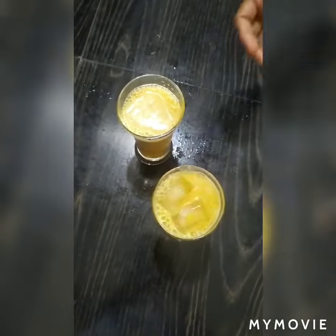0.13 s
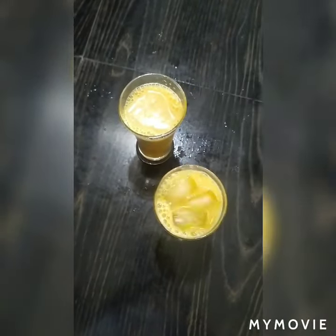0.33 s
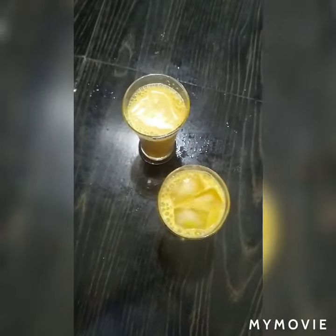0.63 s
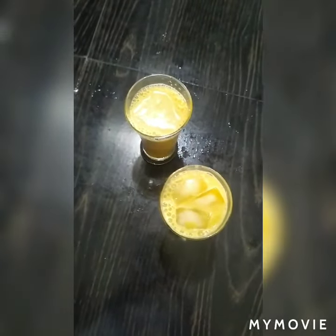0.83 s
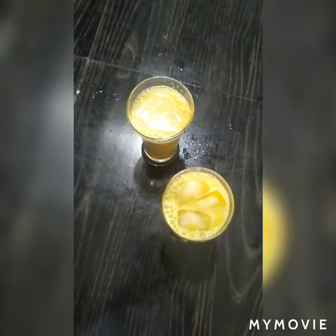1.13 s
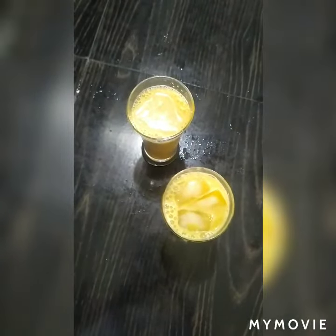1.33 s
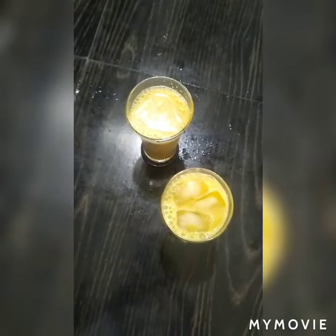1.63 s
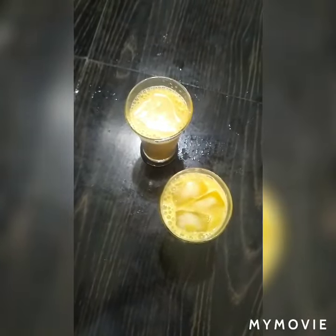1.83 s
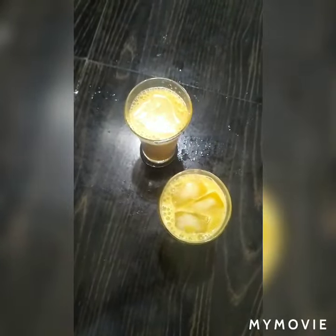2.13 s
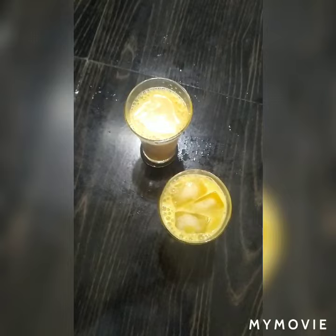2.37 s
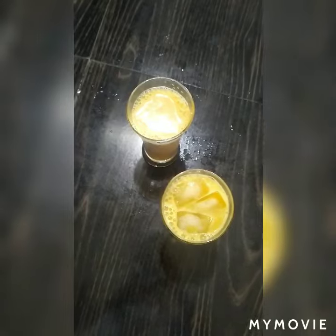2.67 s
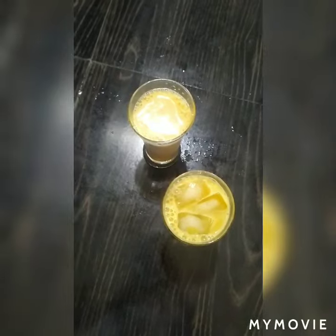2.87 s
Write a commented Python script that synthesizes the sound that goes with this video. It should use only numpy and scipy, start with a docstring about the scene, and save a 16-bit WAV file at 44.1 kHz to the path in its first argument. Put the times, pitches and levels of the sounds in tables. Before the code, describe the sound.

Ice cubes clink in a glass of juice, then knock and crunch in a tray nearby

```python
"""Ice in a tumbler, more in the tray

Near the microphone an ice cube in a tumbler of juice clinks, as damped partials and a bright tick, then settles;
two-part ringing, tones plus fading noise, is left from its drop. A little further off, ice is handled, probably
in its tray: light clicks, hard knocks and dull bumps, then a crunch of random tiny fractures as cubes break loose.
A bare, ringing room, made of decaying noise, answers each one. Faint hum and hiss are steady coloured noise,
the hiss swelling and sinking."""
import sys
import numpy as np
from scipy import signal
from scipy.fft import rfft, irfft
from scipy.io import wavfile

SR = 44100
rng = np.random.default_rng(int(sys.argv[2]) if len(sys.argv) > 2 else 0)


def unload_audio(sound):
    """Save the sound as a 16-bit wav file, at the path given as the first command line argument."""
    columns = np.transpose(np.atleast_2d(sound))
    # keep every value between -1 and 1, then stretch to whole-number steps
    steps = np.round(np.clip(columns, -1, 1) * 32767)
    wavfile.write(sys.argv[1], SR, steps.astype(np.int16))


N = 132300  # three seconds

# Decay of the room by pitch: f/Hz, t60/s
ROOM_DECAY = [(100, 0.64), (260, 0.75), (700, 0.76), (1900, 0.86), (4800, 0.7), (8000, 0.59), (13000, 0.4),
              (16000, 0.36)]
ROOM_GAP_S, ROOM_BUILD_S = 0.0026, 0.0022  # silence before the echo, then its rise

# Colour of the room hum: f/Hz, relative level/dB per Hz
HUM_COLOUR = [(25, -52), (45, -6), (75, 3.5), (105, -7), (140, 4), (190, -6), (290, -4.5), (450, -11.5),
              (1000, -17), (2800, -19), (5000, -34), (15000, -34.5)]
HUM_DB = -64
# Colour of the hiss: f/Hz, relative level/dB per Hz
HISS_COLOUR = [(100, 12), (1500, -15.5), (2900, 0.5), (4000, -0.5), (5500, -1.5), (7500, 3.5),
               (11000, -1.5), (15500, -10.5)]
# Swell of the hiss: t/s, level/dB
HISS_SWELL = [(0, -75), (.7, -68), (1.2, -68), (1.75, -64), (1.88, -62), (2.1, -66.5), (2.3, -63),
              (2.47, -66.5), (2.63, -62), (3, -54)]

# Tones still ringing from the drop: f/Hz, level/dB, t60/s
DROP_TONES = [(238, -57.5, 1.5), (2040, -63, 0.82), (2220, -69, 0.5)]
# Colour of the drop's echo in the room: f/Hz, relative level/dB per Hz
DROP_ECHO_COLOUR = [(300, -14), (700, -12), (950, -2.5), (1700, -6), (2500, -6), (3800, -12.5), (8000, -17),
                    (15000, -24)]
DROP_ECHO_DB, DROP_FADE_DB_PER_S = -56.5, 27.5

# Taps of the cube on the glass: t/s, level/dB, pitch f/Hz, then relative to the tap: low partial/dB, tick/dB
GLASS_TAPS = [(0.0385, -29.5, 2450, -15, -17.5), (0.083, -37, 2250, -7, -16), (0.122, -44, 2240, -3, 2),
              (0.127, -42, 2290, -14, -5), (0.1353, -27.5, 2420, -16, -15), (0.218, -40, 2450, -14, -7.5),
              (0.257, -48, 2400, -7, -17), (0.3397, -46, 2400, -8, -5), (0.382, -49.5, 1870, 0.5, -8),
              (0.445, -47, 2220, 4.5, 2.5), (0.462, -50, 2100, 1, -11)]
# Partials of each tap: ratio to its pitch, relative level/dB, t60/s
TAP_PARTIALS = [(.87, -4.5, .012), (1, 1, 0.007), (1.17, 0, 0.0056), (1.38, -6.5, 0.0036)]
# Colour of the bright contact tick: f/Hz, response/dB
TICK_COLOUR = [(100, -10), (900, 8), (2800, 14), (4500, 12), (8000, 12.5), (15000, -2)]
CLINK_LOW_HZ, CLINK_LOW_T60_S, CLINK_WET_DB = 1170, 0.009, -13.5
TABLE_ECHO_S, TABLE_ECHO_DB = 0.00301, -7.5

# Soft bumps of the tray on its surface: t/s, level/dB, f/Hz, t60/s
TRAY_BUMPS = [(0.8123, -37, 165, 0.016), (0.828, -51.5, 262, 0.057), (1.266, -25, 217, 0.055)]
BUMP_WET_DB = -8

# Light clicks of ice in the tray: t/s, burst length/s, crack gain/dB, ping gain/dB
ICE_CLICKS = [(0.827, 0.0029, -5.5, -42), (0.8325, 0.00043, -16, -54), (0.8353, 0.00089, -15.5, -39)]
# Colour of a click's crack: f/Hz, response/dB
CLICK_COLOUR = [(60, -3.5), (250, -4), (480, -11.5), (800, -3.5), (1100, -4.5), (1400, 1.5), (2000, 3),
                (2900, -3.5), (4200, -9), (5300, -0.5), (6900, 1.5), (9000, -0.5), (12700, -2), (15500, -7)]
# Brief ping under a click: f/Hz, relative level/dB, t60/s
CLICK_PING = [(2070, 0.0049, 0.032)]
CLICK_WET_DB = 0.5

# Hard knocks of ice in the tray:
# t/s, burst length/s, crack gain/dB, treble tilt/dB per octave, body gain/dB, thump gain/dB
TRAY_KNOCKS = [(1.2638, 0.00196, 3.5, 1, -14.5, -27.5), (1.2805, 0.0026, -19.5, -2.5, -26, -58),
               (1.287, 0.0014, -9, -2.5, -30, -58), (2.661, 0.0027, -1.5, 0, -13.5, -58),
               (2.6672, 0.0016, -0.5, 7, -13.5, -31), (2.680, 0.0017, 3, 6.5, -13, -50),
               (2.722, 0.002, -12, -2, -35, -45), (2.7945, 0.00042, -22, 1, -24, -46)]
# Colour of a knock's crack: f/Hz, response/dB
CRACK_COLOUR = [(60, 12.5), (250, -7), (500, -5.5), (850, 2.5), (1200, -4.5), (1700, 2), (2300, 3.5),
                (3500, -1.5), (5200, -11.5), (7000, -3), (9000, 1.5), (11000, -6.5), (13200, -5),
                (16000, -8.5)]
# Short ring of ice and tray: f/Hz, relative level/dB, t60/s
BODY_MODES = [(1500, -14.5, .010), (2100, -7.5, 0.02), (2420, -10.5, 0.016), (2853, 1, 0.012)]
# Thump of the surface under the tray: f/Hz, relative level/dB, t60/s
THUMP_MODES = [(106, -28, 0.051), (197, -19, 0.88), (242.5, -5, 0.33)]
# Colour of a knock's echo: f/Hz, response/dB
KNOCK_ECHO_COLOUR = [(110, -4.5), (300, 0), (700, 1.5), (1000, 5), (1600, 4), (2100, 5.5), (2900, 5.5),
                     (3900, 3.5), (5000, 7), (9000, -5), (14000, -1.5)]
KNOCK_WET_DB = 1.5

# Force of the fracturing: t/s, level/dB
FRACTURE_FORCE = [(2.661, -20), (2.668, -22.5), (2.678, -14), (2.695, -18), (2.715, -20.5), (2.76, -26.5),
                  (2.80, -31), (2.83, -44), (2.95, -76)]
# Colour of the crunch: f/Hz, response/dB
CRUNCH_COLOUR = [(50, -8.5), (120, -10), (250, -10), (400, -20.5), (750, -10), (1000, -5.5), (1400, 1.5),
                 (2000, 5), (2800, 5), (3700, -0.5), (4800, 2.5), (6400, 0.5), (7500, 3), (9400, 0.5),
                 (11800, -5.5), (12700, -8.5), (13800, -16), (15500, -8)]
# Longer tones that the crunch wakes: f/Hz, level/dB, t60/s
CRUNCH_TONES = [(1156, -40, 0.65), (1518, -33.5, 0.76), (1670, -35, 0.88), (1793, -30, 0.78),
                (2000, -53, 0.43), (2000, -26.5, 0.32), (2240, -34, .5), (2420, -23.5, 0.26),
                (2790, -38.5, 0.84), (3080, -35, 0.99), (5916, -46, 0.3), (6398, -47, .5),
                (6570, -34, 0.71), (9950, -26, 0.33)]
CRUNCH_PER_S, CRUNCH_SCATTER_DB = 4000, 4.5  # fractures of all cubes together, spread of their sizes
CRUNCH_WET_DB, CRUNCH_TONES_S = -0.5, 2.677

# Recorder: bass cut, peak ceiling (full scale = 1), top of the treble
LOW_CUT_HZ, HEADROOM, TOP_HZ = 51, .55, 15750


def amp(db):
    """Decibels to gain."""
    return 10 ** (np.asarray(db) / 20)


def clock():
    """Time of every sample in seconds."""
    return np.arange(N) / SR


def at_hz(points, f):
    """Read a table over log frequency."""
    hz, value = np.array(points, float).T
    return np.interp(np.log(np.maximum(f, 1)), np.log(hz), value)


def colour(x, points, tilt_db=0):
    """Causal minimum-phase filter of a (f/Hz, response/dB) table, tilted above 1 kHz about 6 kHz."""
    size = 4096
    f = np.maximum(np.fft.rfftfreq(size, 1 / SR), 1)
    octaves = np.log2(np.maximum(f, 1000) / 6000)
    cepstrum = irfft(np.log(amp(at_hz(points, f) + tilt_db * octaves)))
    # folding the cepstrum forward in time makes the filter causal
    cepstrum[1:size // 2] *= 2
    cepstrum[size // 2 + 1:] = 0
    impulse = irfft(np.exp(rfft(cepstrum)))
    return signal.fftconvolve(x, impulse)[:len(x)]


def noise(points):
    """Coloured noise of unit level."""
    x = colour(rng.standard_normal(N), points)
    return x / x.std()


def ring(modes, length_s=1):
    """Damped sines of a struck thing; neighbours in the table start in opposite directions."""
    t = np.arange(int(length_s * SR)) / SR
    out = np.zeros(len(t))
    for k, (hz, db, t60) in enumerate(modes):
        decay = amp(db - 60 * t / t60)
        out += (-1) ** k * decay * np.sin(2 * np.pi * hz * t)
    return out


def snap(length_s, size=4096):
    """A brittle contact: a brief random burst of unit energy with a nearly even spectrum."""
    fade = np.exp(-(np.arange(size) / SR / length_s / 2) ** 2)
    x = rng.standard_normal(size) * fade
    for _ in range(2):  # flatten the spectrum, then shorten the burst again
        spectrum = rfft(x)
        x = irfft(spectrum / (abs(spectrum) + 1e-12)) * np.sqrt(fade)
    return x / np.linalg.norm(x)


def add(track, start_s, x):
    """Mix a sound into a track."""
    i = max(int(start_s * SR), 0)
    track[i:i + len(x)] += x[:N - i]


def room(x):
    """Diffuse echo: bands of noise of unit total energy, each with its own decay; the top treble dies first."""
    t = np.arange(SR) / SR
    spectrum = rfft(rng.standard_normal(SR))
    f = np.fft.rfftfreq(SR, 1 / SR)
    tail = np.zeros(SR)
    for k, (_, t60) in enumerate(ROOM_DECAY):
        # each band fades over into its neighbours
        share = at_hz([(row[0], j == k) for j, row in enumerate(ROOM_DECAY)], f)
        tail += irfft(spectrum * share) * np.exp(-np.log(1000) * t / t60)
    tail *= np.clip((t - ROOM_GAP_S) / ROOM_BUILD_S, 0, 1)
    return signal.fftconvolve(x, tail / np.linalg.norm(tail))[:N]


def background():
    """Room tone: steady low-pitched hum noise under a faint hiss that swells and sinks."""
    hum = amp(HUM_DB) * noise(HUM_COLOUR)
    hiss_gain = amp(np.interp(clock(), *np.array(HISS_SWELL).T))
    return hum + hiss_gain * noise(HISS_COLOUR)


def drop_tail():
    """The last of the drop: damped tones of the glass over fading noise from the room."""
    out = amp(DROP_ECHO_DB - DROP_FADE_DB_PER_S * clock()) * noise(DROP_ECHO_COLOUR)
    add(out, 0, ring(DROP_TONES))
    return out


def clinks():
    """The floating cube taps the glass close by; the juice damps each tap at once and the table mirrors it."""
    taps = np.zeros(N)
    for s, db, hz, low_db, tick_db in GLASS_TAPS:
        modes = [(CLINK_LOW_HZ, low_db, CLINK_LOW_T60_S)]
        modes += [(hz * ratio, part_db, t60) for ratio, part_db, t60 in TAP_PARTIALS]
        add(taps, s, amp(db) * ring(modes, length_s=.1))
        add(taps, s, amp(db + tick_db) * colour(snap(0.0013), TICK_COLOUR))
    out = taps.copy()
    add(out, TABLE_ECHO_S, amp(TABLE_ECHO_DB) * taps)
    return out + amp(CLINK_WET_DB) * room(out)


def bumps():
    """The tray bumps its surface around the clicks and first knock: single low, damped sines with an echo."""
    out = np.zeros(N)
    for s, db, hz, t60 in TRAY_BUMPS:
        add(out, s, ring([(hz, db, t60)]))
    return out + amp(BUMP_WET_DB) * room(out)


def clicks():
    """A cube clicks against the tray and bounces: a brief damped ping, and a crack that echoes in the room."""
    cracks, pings = np.zeros(N), np.zeros(N)
    for s, length_s, crack_db, ping_db in ICE_CLICKS:
        add(cracks, s, amp(crack_db) * colour(snap(length_s), CLICK_COLOUR))
        add(pings, s, amp(ping_db) * ring(CLICK_PING, length_s=.1))
    return pings + cracks + amp(CLICK_WET_DB) * room(cracks)


def knocks():
    """Each knock is a bright, echoing crack, a short ring of ice and tray and a thump of the surface below."""
    cracks, rings = np.zeros(N), np.zeros(N)
    body, thump = ring(BODY_MODES, length_s=.1), ring(THUMP_MODES)
    for s, length_s, crack_db, tilt_db, body_db, thump_db in TRAY_KNOCKS:
        add(cracks, s, amp(crack_db) * colour(snap(length_s), CRACK_COLOUR, tilt_db))
        add(rings, s, amp(body_db) * body)
        add(rings, s, amp(thump_db) * thump)
    echo = room(colour(cracks, KNOCK_ECHO_COLOUR))
    return cracks + rings + amp(KNOCK_WET_DB) * echo


def crunch(count=4):
    """Cubes break loose at once: each a run of tiny random fractures with its own echo; some tones ring on."""
    t = clock()
    force = amp(np.interp(t, *np.array(FRACTURE_FORCE).T)) * (t > FRACTURE_FORCE[0][0])
    out = np.zeros(N)
    for _ in range(count):
        scatter = CRUNCH_SCATTER_DB * np.clip(rng.standard_normal(N), -2, 2)
        sizes = rng.choice([-1, 1], N) * amp(scatter)
        cracks = (rng.random(N) < CRUNCH_PER_S / count / SR) * sizes
        cube = colour(force * cracks / cracks.std(), CRUNCH_COLOUR) / np.sqrt(count)
        out += cube + amp(CRUNCH_WET_DB) * room(cube)
    add(out, CRUNCH_TONES_S, ring(CRUNCH_TONES))
    return out


def scene():
    """All sources, near and further off, at one microphone."""
    tumbler = drop_tail() + clinks()
    tray = bumps() + clicks() + knocks() + crunch()
    return (background() + tumbler + tray)[None]


def record(dry):
    """The recorder rounds the loudest peaks, thins the deep bass and cuts the top."""
    rounded = HEADROOM * np.tanh(dry / HEADROOM)
    bass_cut = signal.butter(3, LOW_CUT_HZ, "high", fs=SR, output="sos")
    top_cut = signal.ellip(10, .2, 80, TOP_HZ, fs=SR, output="sos")
    return signal.sosfilt(top_cut, signal.sosfilt(bass_cut, rounded))


dry = scene()
out = record(dry)
unload_audio(out)
```